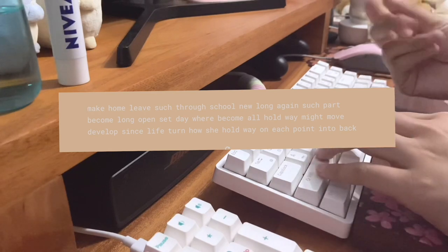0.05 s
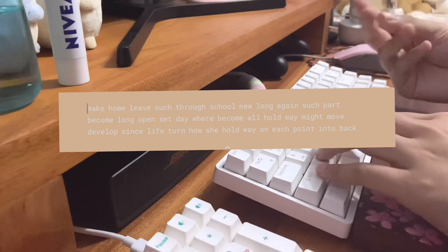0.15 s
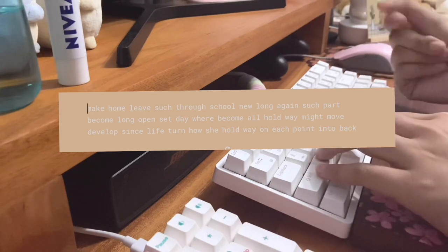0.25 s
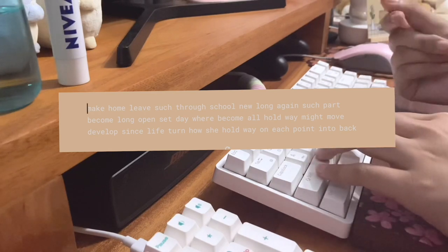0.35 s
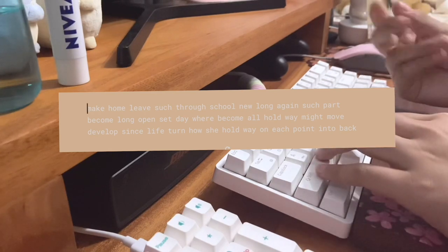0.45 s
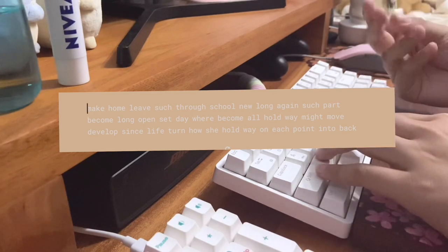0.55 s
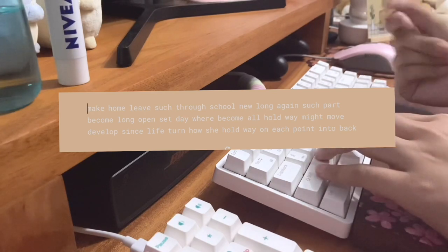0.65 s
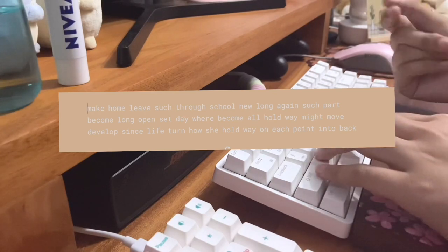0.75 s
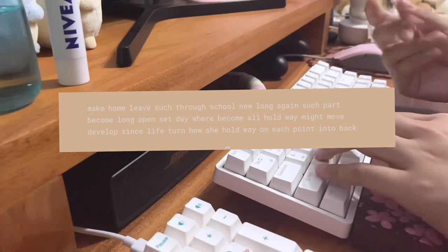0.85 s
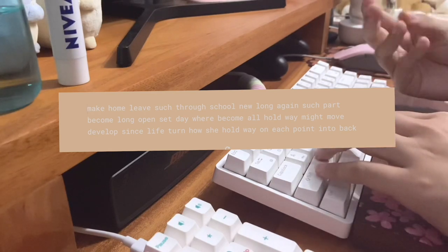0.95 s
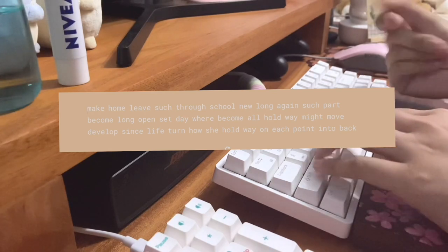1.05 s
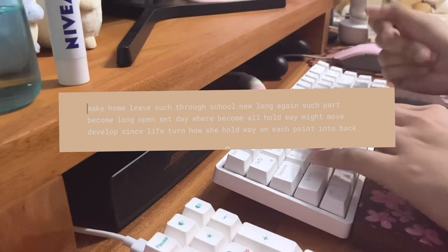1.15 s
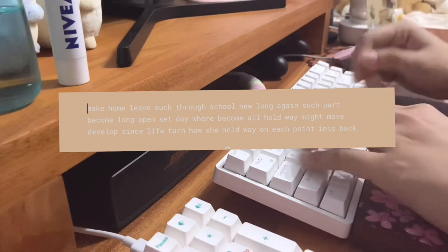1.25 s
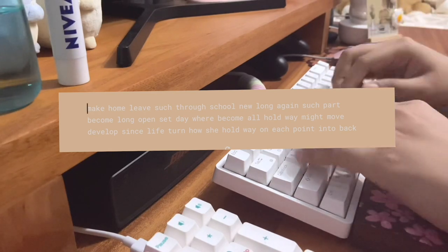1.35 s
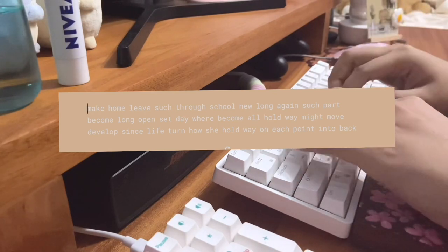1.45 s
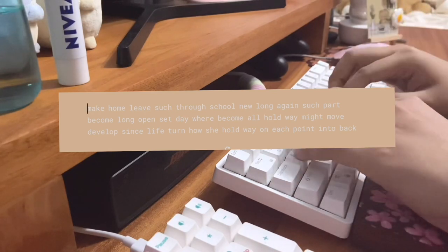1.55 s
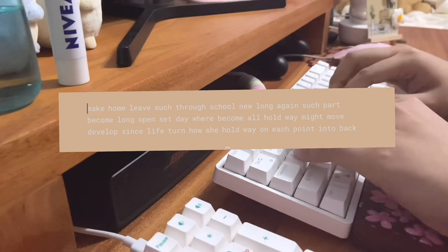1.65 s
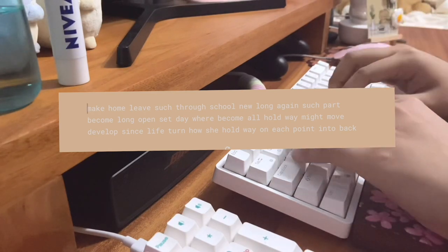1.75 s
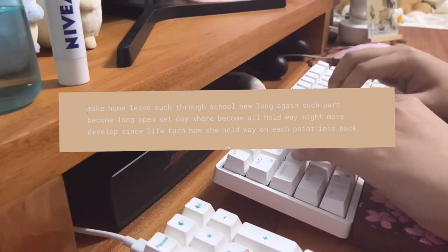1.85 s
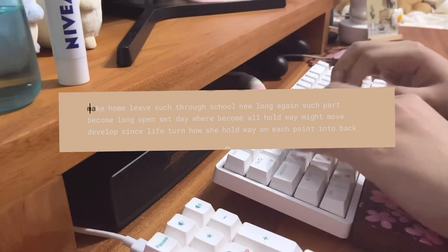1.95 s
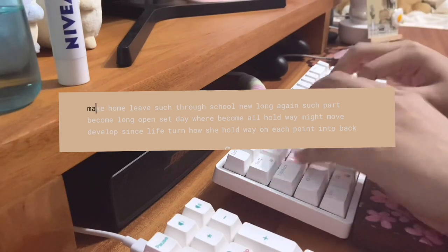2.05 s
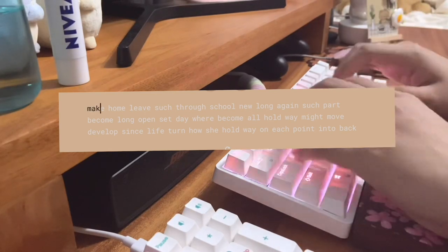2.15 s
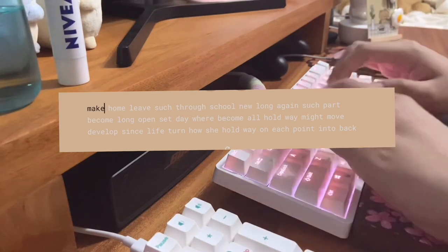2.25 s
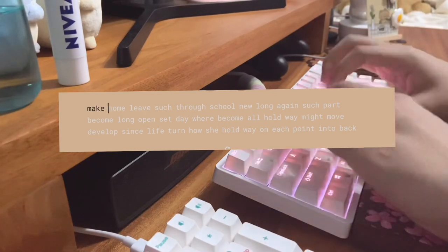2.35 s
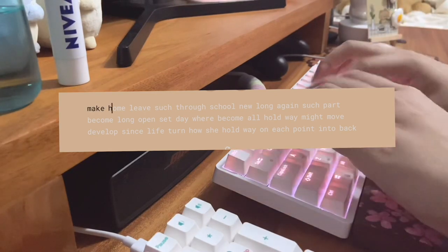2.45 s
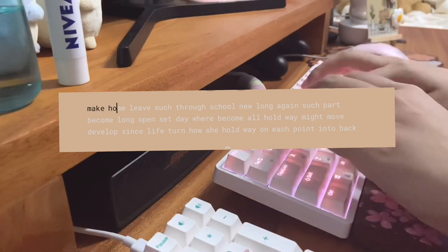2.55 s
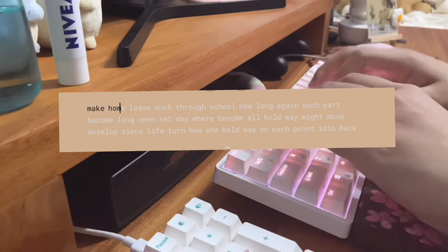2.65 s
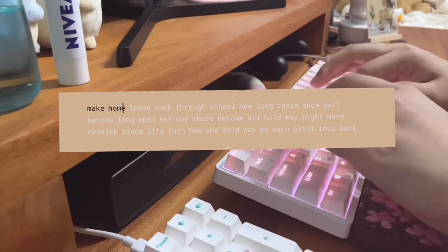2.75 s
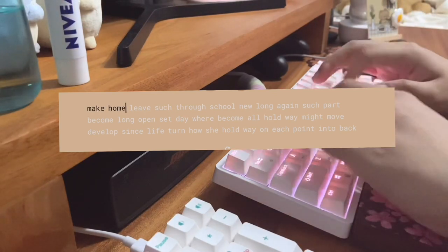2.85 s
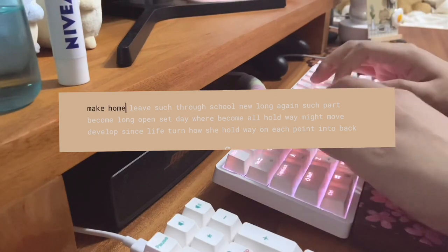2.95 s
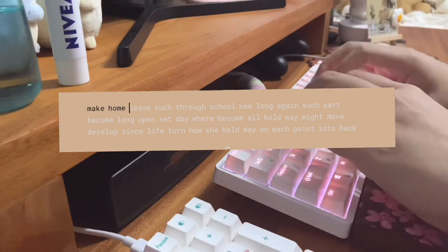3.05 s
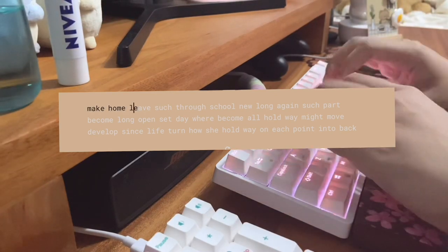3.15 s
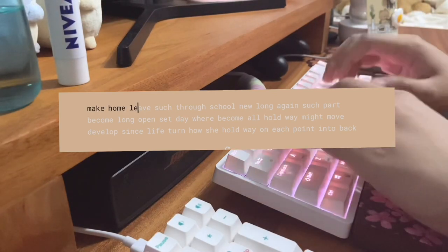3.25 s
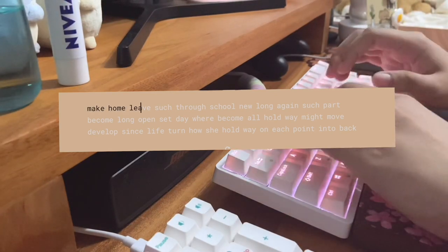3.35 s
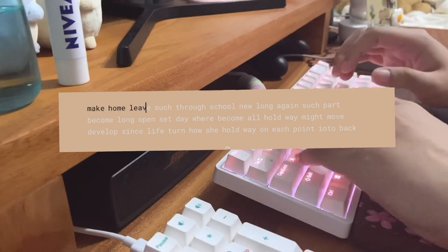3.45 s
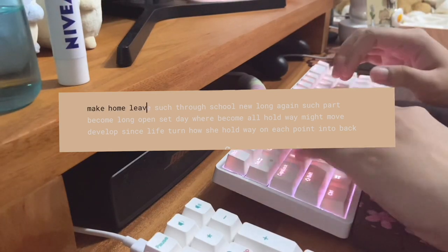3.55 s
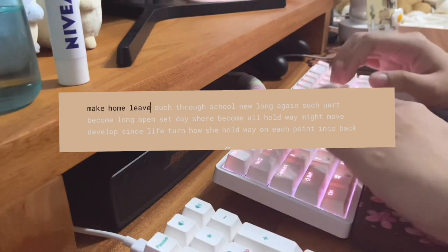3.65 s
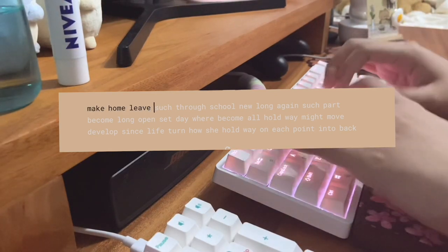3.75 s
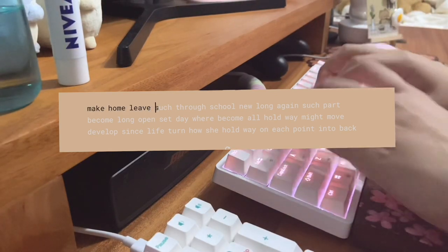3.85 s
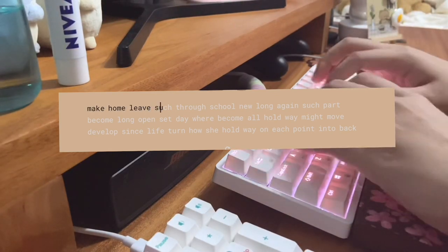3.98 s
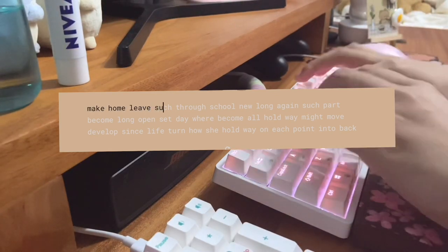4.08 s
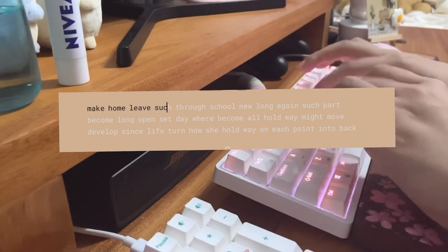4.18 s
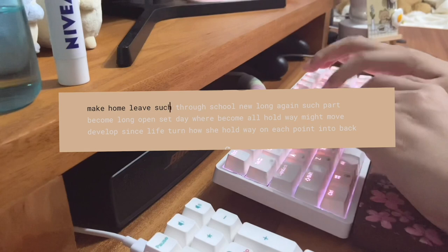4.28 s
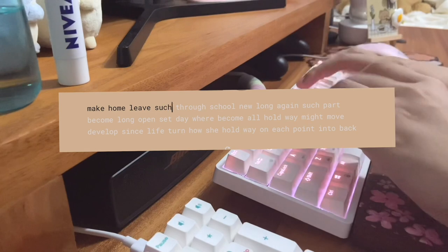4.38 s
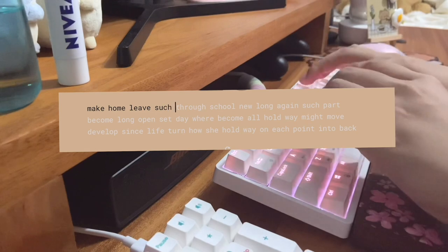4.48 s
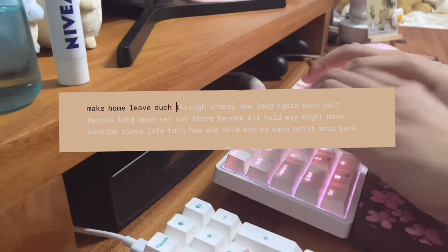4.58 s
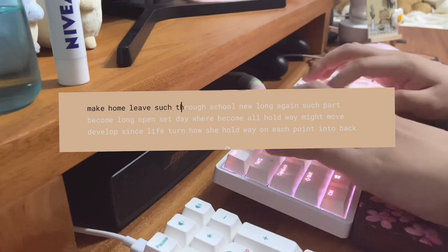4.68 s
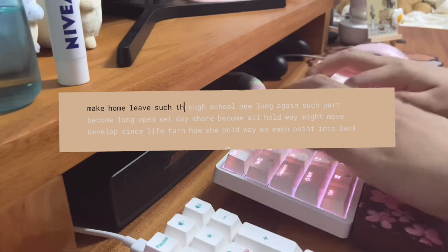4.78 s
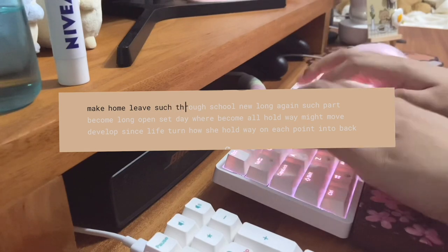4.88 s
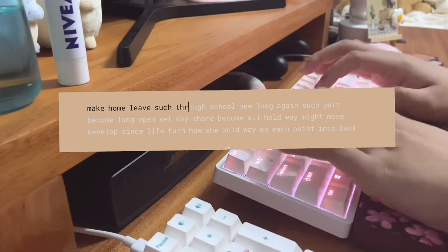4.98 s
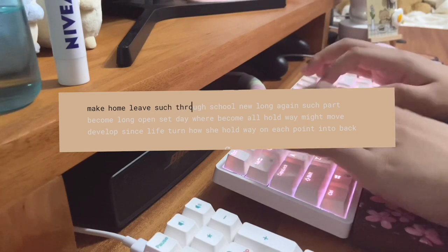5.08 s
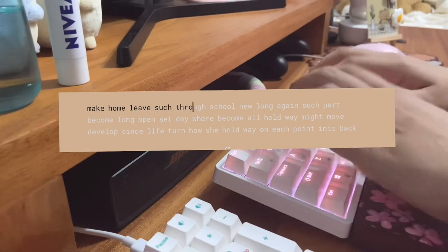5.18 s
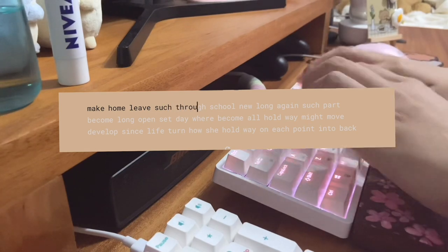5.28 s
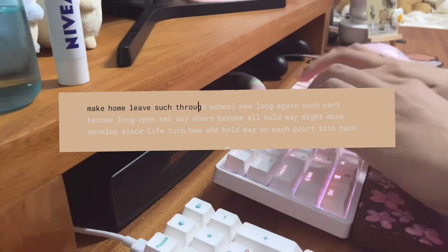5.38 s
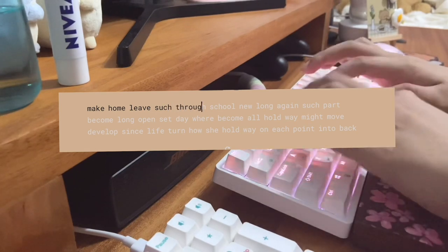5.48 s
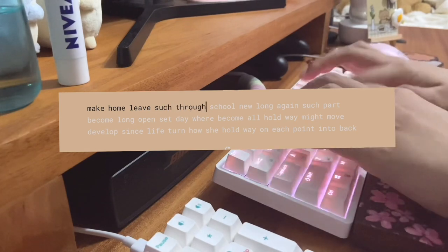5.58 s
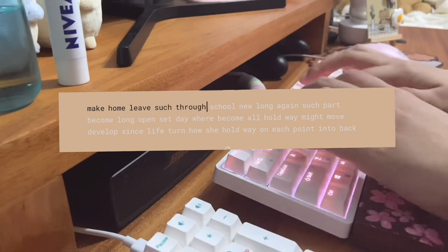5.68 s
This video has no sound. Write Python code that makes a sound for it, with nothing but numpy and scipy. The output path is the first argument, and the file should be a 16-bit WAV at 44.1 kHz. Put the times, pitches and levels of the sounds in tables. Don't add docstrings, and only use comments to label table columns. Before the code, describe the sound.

In a small room, close to a phone on a desk, a hand snaps its fingers three times. After light key rattles and a short lull, both hands type quickly and unevenly on a mechanical keyboard. Clacks vary from dull to bright, with steel-plate ping, occasional spacebar knocks and wooden desk thuds, over faint household rumble and until the end.

```python
import sys
import numpy as np
from scipy import signal
from scipy.fft import rfft, irfft
from scipy.io import wavfile
from scipy.ndimage import uniform_filter1d

SR = 44100
rng = np.random.default_rng(int(sys.argv[2]) if len(sys.argv) > 2 else 0)


def elevation(decibels):
    levels = np.asarray(decibels, float)
    return 10 ** (levels / 20)


def transcribe(signal):
    frames = np.atleast_2d(signal).T
    limited = np.clip(frames, -1, 1)
    pcm = np.round(limited * 32767).astype(np.int16)
    wavfile.write(sys.argv[1], SR, pcm)


N = 252252
GRAIN = 8192
LEAD = 256
SIDES = np.array([[1], [-1]])
TICK_RISE_MS = 0.3
SHELL_HIT_MS, SHELL_RISE_MS, SHELL_EARLY_S, SHELL_DB = 2.5, 0.6, 0.0008, -7.5


def along(table, hz, column=1):
    table = np.array(table)
    return np.interp(np.log(hz + 1), np.log(table[:, 0]), table[:, column])


def pole(f, hz, width):
    return 1 / (1 + 1j * (f / hz - hz / f) * hz / width)


def ring(modes, scatter_db, count, even=False):
    f = np.fft.rfftfreq(GRAIN, 1 / SR) + 0.0044
    hz, width, db = np.array(modes).T
    chance = rng.standard_normal((count, 3, len(hz)))
    sign = (-1) ** np.arange(len(hz)) if even else np.sign(chance[:, 1])
    gain = elevation(db + scatter_db * chance[:, 0]) * sign
    centre = hz * (1 + 0.03 * chance[:, 2])
    return sum(gain[:, k, None] * pole(f, centre[:, k, None], width[k]) for k in range(len(hz)))


def contact(decay_ms, rise_ms, unlike, lumpy_db):
    ms = np.arange(GRAIN // 4) * 1000 / SR
    decay_ms = np.clip(decay_ms, .1, 12)[:, None, None]
    shape = (1 - np.exp(-ms / rise_ms)) ** 2 * np.exp(-ms / decay_ms)
    shape = shape * (1 + 1.5 * np.exp(-ms / 0.93))
    chance = rng.standard_normal((len(decay_ms), 3, len(ms)))
    lumps = elevation(lumpy_db * uniform_filter1d(chance[:, 2:], size=31) * np.sqrt(31))
    force = chance[:, :1] + unlike * chance[:, 1:2] * SIDES
    force = rfft(force * lumps * shape, GRAIN)
    usual = uniform_filter1d(np.abs(force) ** 2, size=41).mean(axis=1, keepdims=True)
    return force / usual ** .4


def sized(spectra, db, window=110):
    blows = np.roll(irfft(spectra, GRAIN), LEAD, axis=2)
    blows = blows * np.clip((np.arange(GRAIN) - LEAD) / 16 + 1, 0, 1)
    top = uniform_filter1d(blows.mean(axis=1) ** 2, size=window).max(axis=1)
    return blows * (elevation(db) / np.sqrt(2 * top))[:, None, None]


def place(times, blows, size=101):
    power = uniform_filter1d(np.abs(rfft(blows)) ** 2, size=size).mean(axis=1, keepdims=True)
    smooth = np.roll(irfft(np.sqrt(power), GRAIN), 2 * LEAD, axis=2)
    smooth = smooth[:, :, :4 * LEAD] * np.hanning(4 * LEAD)
    out = np.zeros((4, N + GRAIN + LEAD))
    starts = (np.maximum(times, 0) * SR).astype(int)
    for start, blow, click in zip(starts, blows, smooth):
        out[:2, start:start + GRAIN] += blow
        out[2:, start:start + click.shape[1]] += click
    return out[:, LEAD:N + LEAD]


def air():
    # (f/Hz, level per Hz/dB)
    air_colour = [(15, -60.5), (25, -33.5), (53, 1.5), (123, -5.5), (181, -7), (219, -7.5), (260, -14),
                  (308, -6.5), (487, -16), (1110, -26.5), (1510, -30.5), (8000, -50), (10400, -90),
                  (17600, -120)]
    # (f/Hz, correlation 0-1)
    likeness = [(60, 1), (130, 0.79), (290, 0.8), (640, 0), (1400, 0.4), (3100, 0), (6000, 0.05)]
    f = np.fft.rfftfreq(N, 1 / SR)
    hiss_db = 7.2 * np.clip(f / 1000 - 8.5, 0, 1) - 5.8 * np.maximum(f / 1000 - 12.6, 0)
    colour = elevation(along(air_colour, np.minimum(f, 7000)) + hiss_db)
    like = np.clip(along(likeness, f), 0, 1)
    mid, side = rfft(rng.standard_normal((2, N))) * colour
    mid = irfft(mid * np.sqrt(1 + like), N)
    side = irfft(side * np.sqrt(1 - like), N)
    swell = np.repeat(rng.standard_normal(N // 4096 + 1), 4096)
    swell = uniform_filter1d(swell, size=4096)[:N]
    gain = elevation(-64.5 + 1.7 * swell) / np.std(mid)
    return gain * (mid + side * SIDES)


def snaps():
    # (t/s, level/dB, left minus right/dB, hollow of the hand f/Hz, hollow level/dB)
    snap_events = [
        (0.0355, -18.5, 1.5, 2580, -5.5),
        (0.4473, -16.5, 6.5, 2960, -2.5),
        (0.851, -15.5, 1.5, 2970, -2),
    ]
    # (f/Hz, width/Hz, level/dB)
    palm = [(810, 146, -6), (1800, 300, -6.5), (4060, 2600, -13.5), (5240, 290, 0), (7050, 750, 1.5),
            (9570, 780, -1.5), (13080, 2100, -6), (14980, 1200, -6.5)]
    s, db, pan_db, hollow_hz, hollow_db = np.transpose(snap_events)
    count = len(s)
    f = np.fft.rfftfreq(GRAIN, 1 / SR) + 0.00068
    hollow = elevation(hollow_db)[:, None] * pole(f, hollow_hz[:, None], 300.0)
    hand = ring(palm, 0.8, count, even=True) + hollow
    slap = contact(np.full(count, .55), 1.3, 0.37, 3.0) * hand[:, None]
    out = sized(slap, db - 8.5) * elevation(np.outer(pan_db, [1, -1]) / 2)[:, :, None]
    jolt = contact(np.full(count, 6.0), 3.1, .1, 1.1) * pole(f, 64.0, 35.)
    out += sized(jolt, db - 41.0, window=700)
    slip = contact(np.full(count, 8.0), 0.8, .4, 3.0) * ring(palm, 9.9, count)[:, None]
    rub = contact(np.full(count, 6.0), 19.0, .4, 4.6) * ring(palm, 5.0, count)[:, None]
    before = place(s - .03, sized(slip, db - 45.0)) + place(s - .014, sized(rub, db - 40.0))
    return place(s, out, size=301) + before


def room(x):
    # (f/Hz, time to fall 60 dB/s, level/dB)
    room_bands = [(150, 0.76, -21.5), (470, 0.059, -9.5), (1500, 0.33, -30), (3000, 0.28, -25.5),
                  (7000, 0.33, -29), (13720, 0.4, -30), (16400, 0.29, -22)]
    t = np.arange(SR // 2) / SR
    f = np.fft.rfftfreq(len(t), 1 / SR)
    echo = 0
    for hz in 100 * 2 ** np.arange(0, 7.6, .5):
        band = np.exp(-(np.log2((f + 1) / hz) / 0.39) ** 2)
        mid, side = irfft(rfft(rng.standard_normal((2, len(t)))) * band)
        fade_db = along(room_bands, hz, column=2) - 60 * t / along(room_bands, hz)
        fade = elevation(fade_db) * np.clip(t / 0.00048, 0, 1)
        echo = echo + fade * (mid + 0.85 * min(hz / 1200.0, 1) * side * SIDES)
    return signal.fftconvolve(x, echo * elevation(-15.5), axes=1)[:, :N]


def desk():
    # (t/s, board level/dB, upper modes minus board/dB)
    thuds = [(0.449, -79, 9.5), (1.799, -43, -2.5), (1.839, -67, 7), (1.886, -58, -1.5), (1.97, -42, -10.5),
             (2.087, -57, -3), (2.182, -40, 3.5), (2.311, -53.5, 0), (2.406, -54, -1), (2.545, -44.5, -2),
             (2.615, -51.5, 4), (2.859, -41, -2.5), (2.946, -60.5, 9), (2.993, -54.5, -8),
             (3.227, -58, -10), (3.291, -57, -24), (3.341, -49.5, -8), (3.613, -41, 2.5), (3.76, -56, -3),
             (3.867, -58.5, -26), (4.044, -52.5, -7), (4.17, -51.5, -27), (4.308, -45.5, -6.5),
             (4.56, -62.5, -7), (4.977, -55, -23), (5.121, -56.5, -17), (5.296, -55, -25),
             (5.404, -56.5, -1), (5.585, -37.5, 1.5),
             (5.655, -47.5, 4),
        (5.7, -47.5, -0.5),
        (4.2, -80, -8),
        (3.702, -51.5, 5),
    ]
    # (f/Hz, width/Hz, level/dB)
    desk_low = [(67.3, 10, -28.5), (103, 14, -22), (126.8, 15.8, 11), (170, 65, -3)]
    desk_high = [(226.3, 30, 0.5), (285, 23, 5), (350.3, 21, 5), (367.7, 15.3, 5.5), (483, 31, -4),
                 (767, 172, -2)]
    s, db, upper_db = np.transpose(thuds)
    push = np.hanning(int(9.0 * SR / 1000))
    board = rfft(push, GRAIN) * ring(desk_low, 0.52, len(s))
    out = sized(board[:, None] * np.array([[1.05], [.95]]), db, window=530)
    knock = contact(np.full(len(s), 4.0), 0.62, 0.53, 2.2) * ring(desk_high, 1.3, len(s))[:, None]
    return place(s + 0.0015, out) + place(s - .009, sized(knock, db + upper_db - 0.5, window=350))


def strikes():
    # (t/s, cap ring level/dB, cap ring f/Hz, tick minus cap/dB)
    clicks = [
        (2.0642, -46, 1770, 2.5),
        (2.31, -32, 1723, -8.5),
        (2.4027, -33.5, 1870, -15.5),
        (3.0818, -36, 1680, -19),
        (4.1598, -34.5, 1690, -0.5),
        (4.2347, -35.5, 1715, -18),
        (4.9811, -39, 2290, -10),
        (5.6952, -38.5, 1500, -4.5),
    ]
    clacks = [(1.783, -42.5, 2070, -0.5), (1.7918, -42.5, 1280, -5), (1.8757, -37.5, 2360, -1.5),
              (1.9623, -31.5, 1630, -5), (2.653, -35, 1620, -30), (2.9312, -39.5, 673, -3),
              (3.191, -41, 1790, 0.5), (3.288, -47, 1940, -1), (3.4908, -36, 2190, -15),
              (3.5916, -32, 1800, -12), (3.6038, -37, 1430, 5.5), (3.7496, -37.5, 2350, -12.5),
              (4.648, -59, 2410, -18), (4.782, -43, 1420, -5), (5.2002, -38.5, 1350, -9),
              (5.268, -53.5, 960, 0), (5.404, -35, 1750, -11), (2.5279, -38.5, 2300, 2),
              (2.5347, -34, 2000, -3), (3.478, -39, 1510, -0.5)]
    knocks = [(1.1748, -48, 1570, 3), (1.8466, -44.5, 1530, 2.5), (2.041, -37.5, 1665, 2),
              (2.082, -37, 1600, -18), (2.1708, -37, 1660, 5), (2.251, -45, 1140, -10),
              (2.3, -45.5, 1720, 1), (2.601, -50, 1410, -10), (2.7469, -53, 1480, 0),
              (2.7563, -32.5, 1450, -2.5), (2.975, -47.5, 1460, 2), (2.9849, -36.5, 1494, -5),
              (3.2158, -33.5, 1810, -12.5), (3.358, -35.5, 1380, -2), (3.579, -59, 1500, -5),
              (3.6938, -42, 1170, -6), (3.7308, -46, 2400, -1), (3.8445, -40, 2270, -3),
              (3.8924, -48, 2400, -12), (3.9585, -42, 1010, -1), (4.0212, -48, 1870, 0),
              (4.2973, -48, 870, 11), (4.3879, -41.5, 1190, -12.5), (4.47, -51.5, 1370, 7.5),
              (4.5426, -41.5, 1550, -5), (4.897, -40, 1450, -1.5), (5.1019, -44, 1860, -0.5),
              (5.5744, -35.5, 1650, 7), (5.6667, -46, 2180, -27), (3.3327, -37.5, 1500, -26)]
    rattles = [(1.073, -62, 1410, 0), (1.083, -47, 1600, -3), (1.1022, -48, 1600, -2),
               (1.154, -60, 1500, -12), (1.483, -63, 1600, -12), (1.953, -42.5, 1770, -7.5),
               (2.3704, -47, 1440, -6), (2.614, -37.5, 2430, -11), (2.838, -45, 1500, -11),
               (2.8472, -40.5, 2040, 2), (3.206, -58, 1800, -25), (4.151, -51, 1370, 0),
               (4.2854, -46, 1500, -7), (5.1125, -35, 1640, -13), (2.5385, -45, 1770, 4.5),
               (5.3743, -44, 1460, -13), (5.6514, -41.5, 1010, -6)]
    cushioned = [(1.0865, -54, 1630, 0), (1.236, -56, 1510, -27), (2.1602, -44, 1650, -13),
                 (2.398, -41, 1620, -11), (2.4928, -37.5, 1630, -10), (3.0625, -38, 1480, -10),
                 (3.4448, -47, 1600, -6), (3.454, -44, 1230, -3), (4.045, -46, 1340, -8),
                 (4.1392, -41, 1190, -7), (4.345, -57, 810, -3), (4.493, -54, 1690, -12),
                 (4.555, -32, 1630, -7.5), (4.63, -40.5, 1630, -9.5), (5.2904, -44, 1490, -12),
                 (5.351, -60, 1500, -10), (5.471, -37, 1610, -13), (5.565, -50.5, 1210, -5)]
    taps = [(1.4075, -58, 1350, -18.5), (1.4748, -51, 1720, -23), (1.686, -57, 1500, -24),
            (1.8677, -36, 1340, -9), (2.179, -36, 1630, -12), (2.3879, -37, 1360, -3),
            (3.2924, -49, 1540, -6), (3.8701, -39.5, 1800, -6), (3.9395, -39, 1640, -24),
            (4.6668, -50.5, 1410, -13), (4.8856, -53, 1500, -8), (4.966, -51.5, 1680, -10),
            (5.0693, -55.5, 1640, -10), (5.093, -42, 1720, -13)]
    # (t/s, cap ring level/dB)
    touches_at = [(1.259, -62), (1.391, -70), (1.419, -69), (1.434, -65), (1.454, -66.5), (1.64, -75),
                  (1.665, -71.5), (1.757, -83), (3.347, -77), (3.829, -59.5), (4.759, -63)]
    # (contact time/ms, case minus cap/dB)
    kinds = [
        (2.4, -0.5),
        (6.3, 1),
        (8.8, -0.5),
        (17.6, 2.5),
        (9.7, -2.5),
        (8.1, -5),
        (28, -8),
    ]
    touch_hz, touch_tick_db = 1500, -9.5
    touches = [(s, db, touch_hz, touch_tick_db) for s, db in touches_at]
    tables = [clicks, clacks, knocks, rattles, cushioned, taps, touches]
    rows = [(*row, *kind) for table, kind in zip(tables, kinds) for row in table]
    s, db, hz, tick_db, ms, reach_db = np.transpose(rows)
    case_db = reach_db + 0.45 * tick_db - 3.5 * (hz - touch_hz) / 1000
    return s, db, hz, case_db, tick_db, ms


def keys():
    # (f/Hz, width/Hz, level/dB)
    cap_modes = [(706, 59, -7), (896, 340, -19), (1210, 29, -10), (1410, 46, 0), (1630, 205, -2),
                 (1787, 95, -2.5), (1930, 750, -16)]
    case_modes = [(2300, 100, 4), (2727, 50, 5.5), (3240, 260, 1), (3560, 620, -7), (3800, 110, -19.5),
                  (4110, 260, -8), (4800, 2000, -17.5)]
    tick_modes = [(5000, 340, -11.5), (6270, 340, -9.5), (6980, 960, -8.5), (8270, 360, 3.5),
                  (9290, 400, 0.5), (12710, 2120, -2), (12680, 3100, -4.5), (14600, 600, -13)]
    s, db, hz, case_db, tick_db, ms = strikes()
    count = len(s)
    f = np.fft.rfftfreq(GRAIN, 1 / SR) + 1e-3
    force = contact(0.5 * (ms - 3.2), 0.47, 0.31, 2.93)
    cap = pole(f, hz[:, None], 141.0)
    cap = cap + elevation(-1.5) * ring(cap_modes, 2.1, count) * pole(f, hz[:, None], 1200.0)
    cap = cap / (1 + 1j * f / 1250.0) ** 2
    case = ring(case_modes, 3.2, count)
    tick = ring(tick_modes, 1.7, count, even=True)
    late = np.exp(-2j * np.pi * f * 0.0008)
    out = sized(force * cap[:, None], db)
    out += sized(force * case[:, None], db + case_db - 4.0)
    tick_force = contact(.5 * (ms - 3.0), TICK_RISE_MS, 0.9, 0.68)
    out += sized(tick_force * (tick * late)[:, None], db + tick_db + 0.5)
    body = cap + case * elevation(case_db)[:, None] + elevation(-21.5) * tick * elevation(tick_db)[:, None]
    body = body[:, None]
    out += sized(contact(np.full(count, 11.0), 0.72, 0.32, 4.0) * body, db - 17.0)
    slide = sized(contact(np.full(count, 2.5), 13.0, 0.73, 1.0) * body, db - 24.5)
    return place(s - .001, out) + place(s - .009, slide)


def plate():
    # (t/s, level/dB, ring f/Hz)
    plate_hits = [(1.0805, -47, 3320), (1.173, -34.5, 3020), (1.783, -41.5, 2660), (1.8447, -37, 3330),
                  (1.8748, -30.5, 2870), (1.9608, -35, 2240), (1.9606, -29.5, 2540), (2.0406, -32, 2330),
                  (2.0808, -37, 2780), (2.1563, -45.5, 2310), (2.1703, -31.5, 2970), (2.3091, -34, 3350),
                  (2.3085, -35, 2480), (2.4, -32, 2300), (1.2335, -55, 2730), (2.5266, -37.5, 3560),
                  (2.6142, -58, 2310), (2.6513, -33.5, 2880), (2.757, -38, 2250), (2.756, -37.5, 2510),
                  (2.8415, -38.5, 3200), (2.9327, -34.5, 3370), (2.985, -31, 2910), (3.0804, -31, 2380),
                  (3.189, -38, 2670), (3.2159, -33, 2700), (3.2857, -56, 3330), (3.331, -36.5, 2640),
                  (3.354, -53, 2910), (3.4438, -40, 2500), (3.4765, -40, 3270), (3.4895, -33, 3000),
                  (3.5911, -29, 2800), (3.695, -37, 3280), (3.731, -45, 2360), (3.7486, -34.5, 2520),
                  (3.844, -29.5, 3600), (3.9411, -40, 2410), (4.0226, -44.5, 3280), (4.1393, -50, 2420),
                  (4.1594, -35.5, 3400), (4.2346, -45, 2700), (4.297, -37, 4150), (4.386, -40.5, 3000),
                  (4.4696, -50.5, 3850), (4.5436, -41, 2660), (4.7824, -41, 3460), (1.1015, -43, 2300),
                  (4.8966, -41, 3540), (4.9811, -35.5, 3190), (5.0945, -46, 3050), (5.1156, -35.5, 2600),
                  (5.1993, -41.5, 2530), (5.291, -47, 3400), (5.3768, -40, 3340), (1.1015, -40.5, 3300),
                  (5.5658, -60, 3200), (5.5755, -45, 3320), (5.6526, -42, 3100), (5.6926, -33.5, 3550)]
    s, db, hz = np.transpose(plate_hits)
    f = np.fft.rfftfreq(GRAIN, 1 / SR) + 1e-3
    force = contact(np.full(len(s), 2.4), 0.4, 0.25, 2.2)
    out = sized(force * pole(f, hz[:, None, None], 350), db - 5.5)
    out += sized(force * pole(f, 3060, 24), db - 21)
    return place(s - .0006, out)


def part(table, width_hz, hit_ms, db, rise_ms, early_s, size=101, order=1):
    s, hit_db, hz = np.transpose(table)
    f = np.fft.rfftfreq(GRAIN // 2, 1 / SR) + 1e-3
    ringing = pole(f, hz[:, None, None], width_hz) ** order
    ringing = np.repeat(ringing, 2, axis=2)[:, :, :-1]
    force = contact(np.full(len(s), hit_ms), rise_ms, 0.26, 3.7)
    return place(s - early_s, sized(force * ringing, hit_db + db), size=size)


def square_caps():
    # (t/s, level/dB, ring f/Hz)
    square_hits = [
        (1.1745, -29, 1600),
        (1.0845, -51, 1690),
        (1.2365, -48, 1440),
        (3.066, -28.5, 1460),
        (3.4455, -33, 1500),
        (3.4545, -33, 1400),
        (3.491, -31, 2050),
        (3.8448, -28.5, 2210),
    ]
    return part(square_hits, 370, SHELL_HIT_MS, SHELL_DB, SHELL_RISE_MS, SHELL_EARLY_S, order=2)


def switch_tops():
    # (t/s, level/dB, ring f/Hz)
    top_hits = [(1.1719, -36.5, 7070), (1.7845, -54, 4300), (1.844, -36, 5060), (1.9603, -54, 7280),
                (1.9615, -28.5, 5660), (2.0401, -32, 7650), (2.158, -50, 4300), (2.1703, -35, 5540),
                (2.307, -52, 4240), (2.31, -32.5, 7860), (2.3858, -37, 7930), (2.4921, -41, 7600),
                (2.526, -48, 7450), (2.652, -41.5, 7650), (2.756, -39, 6200), (2.8438, -44, 4270),
                (2.8478, -50, 5100), (2.9301, -50, 4400), (2.984, -41, 6550), (2.9843, -29, 4730),
                (3.188, -38.5, 5630), (3.2857, -56, 7250), (3.3305, -49, 6600), (3.355, -38, 6200),
                (3.4456, -46, 8180), (3.476, -50, 7800), (3.5898, -33.5, 7660), (3.6025, -32, 4660),
                (3.693, -44, 5430), (3.731, -58, 4730), (3.7474, -37, 4400), (3.843, -36, 4830),
                (3.9398, -45, 7840), (3.9582, -41, 7650), (4.0211, -49, 4810), (4.1397, -40, 8000),
                (4.159, -27.5, 7560), (4.2335, -37, 7750), (4.2837, -50, 4660), (4.297, -53, 5100),
                (4.3872, -47, 5600), (4.4688, -46, 4360), (4.5426, -38.5, 7900), (4.6292, -46, 8040),
                (4.7806, -45, 7140), (4.8965, -35, 7140), (5.1001, -47, 4270), (5.198, -39, 8150),
                (5.374, -41, 7040), (5.4033, -38.5, 7000), (5.4698, -35.5, 8200), (5.564, -47, 4300),
                (5.574, -35, 8050), (5.6523, -48, 4890), (5.6927, -36, 6100)]
    return part(top_hits, 650, hit_ms=1.5, db=-7.5, rise_ms=TICK_RISE_MS, early_s=.0001, size=601)


def shell():
    # (t/s, level/dB, ring f/Hz)
    shell_hits = [(1.782, -44.5, 760), (1.845, -47.5, 860), (1.868, -34.5, 725), (1.961, -42.5, 980),
                  (2.044, -37, 1170), (2.17, -40, 840), (2.251, -48, 1050), (2.492, -49.5, 896),
                  (2.526, -35.5, 780), (2.755, -61, 790), (2.845, -40, 1110), (2.932, -54, 710),
                  (2.974, -53, 780), (3.06, -40.5, 1180), (3.217, -35, 1150), (3.332, -36, 1150),
                  (3.356, -37, 969), (3.445, -38.5, 1130), (3.591, -36, 825), (3.692, -50, 1150),
                  (3.731, -41.5, 720), (3.844, -33, 1140), (3.94, -53, 1120), (4.046, -48, 744),
                  (4.14, -38.5, 730), (4.285, -45, 837), (4.385, -53, 1130), (4.474, -45, 970),
                  (4.544, -45.5, 845), (4.783, -44, 806), (4.897, -39.5, 810), (4.98, -37.5, 1135),
                  (5.093, -43, 1140), (5.199, -40, 870), (5.268, -49, 756), (5.567, -49, 790),
                  (5.576, -38, 781), (5.651, -40, 1010)]
    return part(shell_hits, 89, SHELL_HIT_MS, SHELL_DB, SHELL_RISE_MS, SHELL_EARLY_S)


def bar():
    # (t/s, level/dB)
    bar_hits = [
        (2.1724, -45),
        (2.8478, -44),
        (3.6033, -35.5),
        (4.2972, -44.5),
        (4.3441, -57),
        (5.5747, -46),
    ]
    s, db = np.transpose(bar_hits)
    f = np.fft.rfftfreq(GRAIN, 1 / SR) + 1e-3
    wire = pole(f, 4970, 520) ** 2
    out = sized(contact(np.full(len(s), 1.9), 0.25, 0.23, 2.2) * wire, db)
    out += sized(contact(np.full(len(s), 17), 6.0, .6, 4.5) * wire, db - 24)
    return place(s - .0004, out)


def scene():
    background = air()
    thumps = desk()[:2]
    blows = snaps() + keys() + plate() + switch_tops() + shell() + bar()
    walls = blows[2:] + elevation(-9.0) * thumps
    echo = elevation(-20) * np.roll(blows[1::-1], int(0.0088 * SR), axis=1)
    near = blows[:2] + echo + thumps + room(walls) + square_caps()[:2]
    dip = 1 - 0.94 * pole(np.fft.rfftfreq(N, 1 / SR) + 1e-3, 617.0, 95.0)
    return irfft(rfft(near) * dip, N) + background


def low_pass(x):
    return signal.sosfilt(signal.butter(12, 16820, fs=SR, output="sos"), x)


def record(dry):
    shared_hz, turn_hz, top_hz = 6700, 4180, 15900
    f = np.fft.rfftfreq(N, 1 / SR)
    dips_db = 6.0 * np.exp(-((f - 9000) / 1100) ** 2) + 9.0 * np.exp(-((f - 13850) / 550) ** 2)
    ports = rfft(dry) * elevation(SIDES * 0.38 - dips_db)
    shared = np.clip((f - shared_hz) / 1300 + 1, 0, 1)
    turn = np.pi * np.clip((f - shared_hz - 200) / turn_hz, 0, 2.2)
    turn = turn - .14 * np.sin(4 * turn)
    mid = ports.mean(axis=0)
    treble = (mid + .33 * (ports - mid)) * np.exp(-1j * turn * SIDES)
    top_cut = np.clip((top_hz - f) / 900 + .5, 0, 1)
    mix = irfft((ports * (1 - shared) + treble * shared) * top_cut, N)
    return low_pass(mix)


dry = scene()
out = record(dry)
transcribe(out)
```